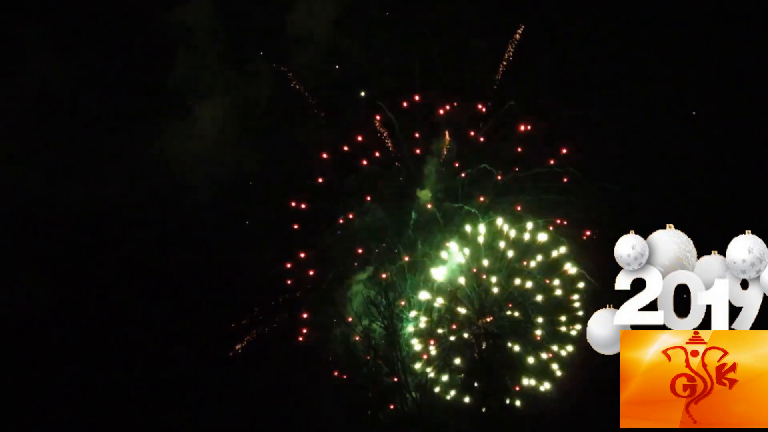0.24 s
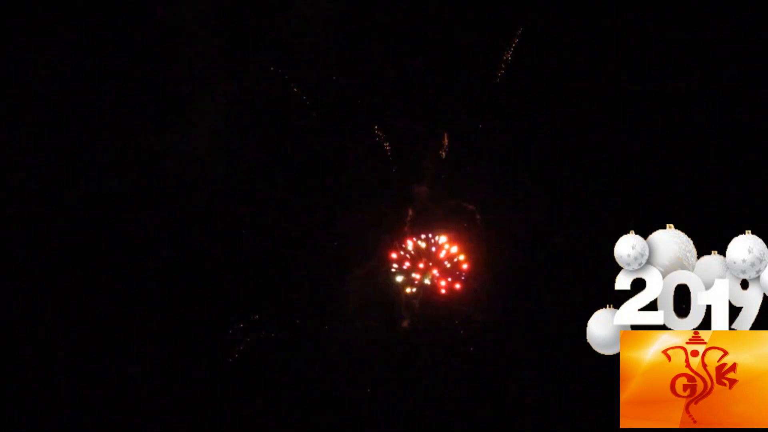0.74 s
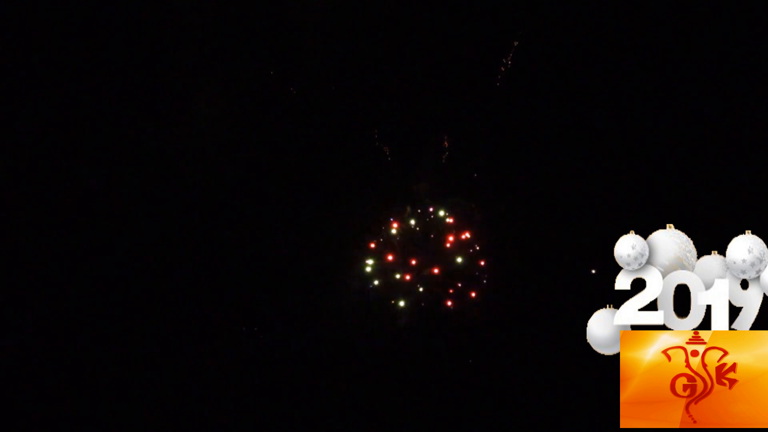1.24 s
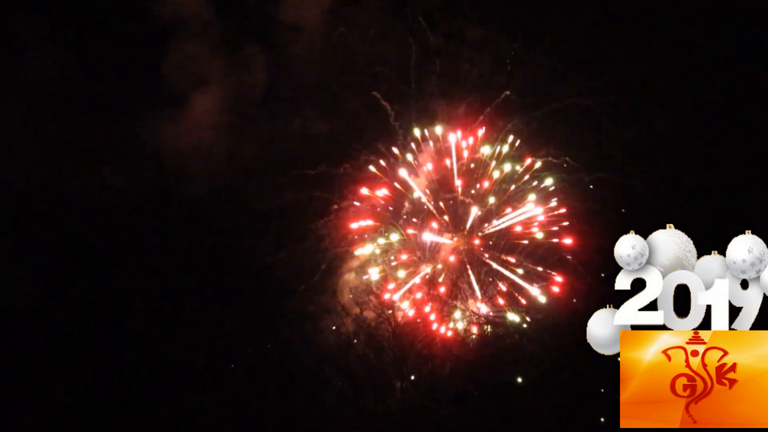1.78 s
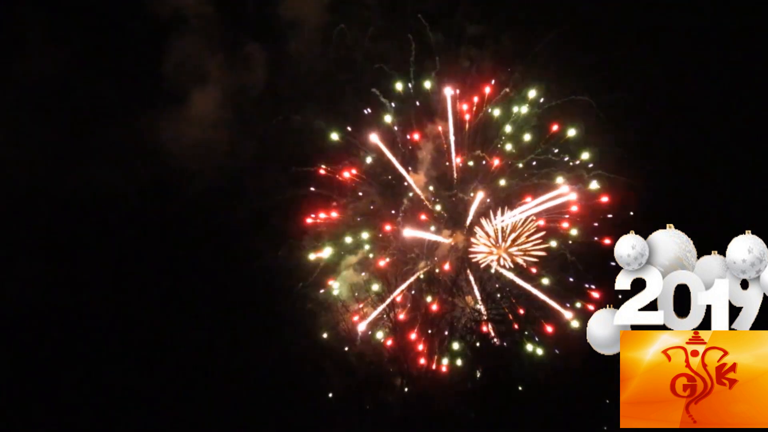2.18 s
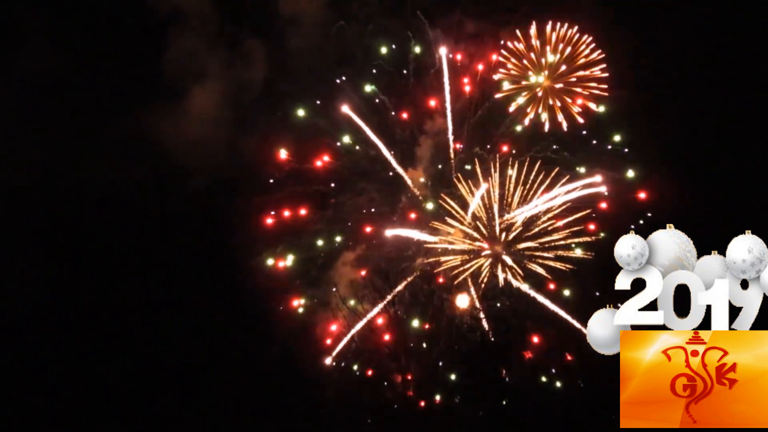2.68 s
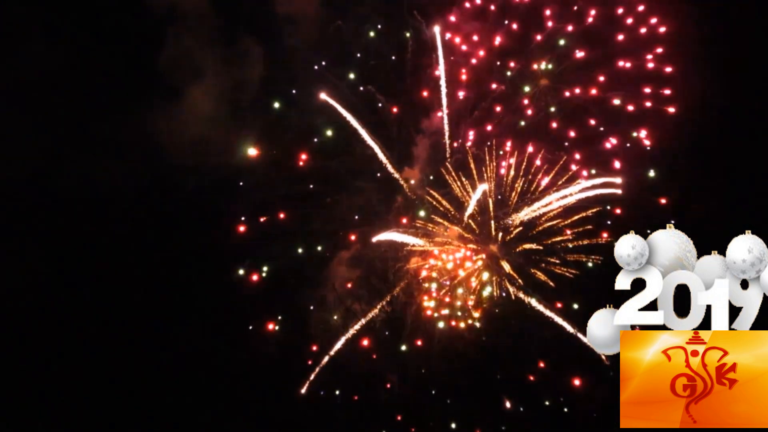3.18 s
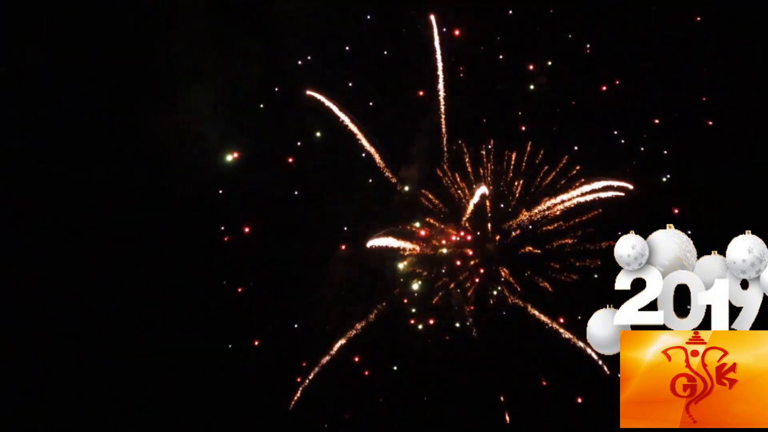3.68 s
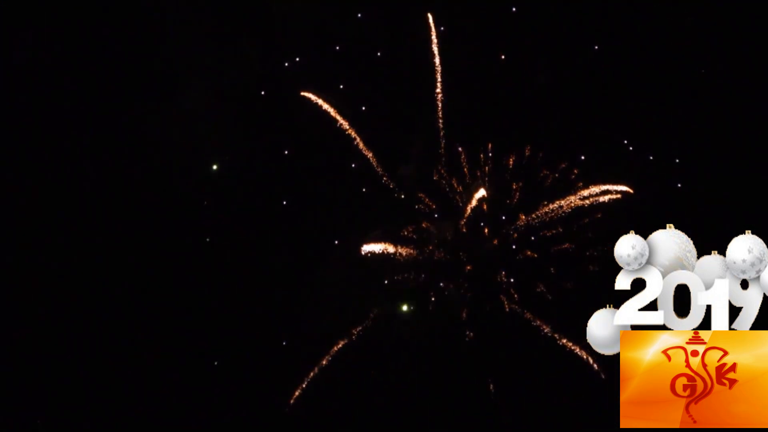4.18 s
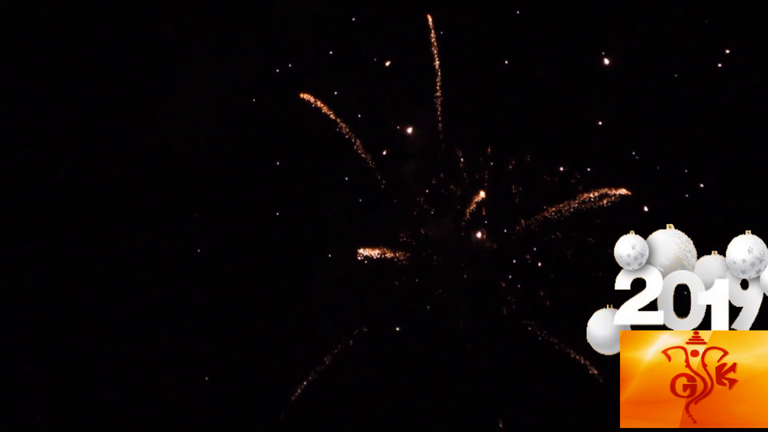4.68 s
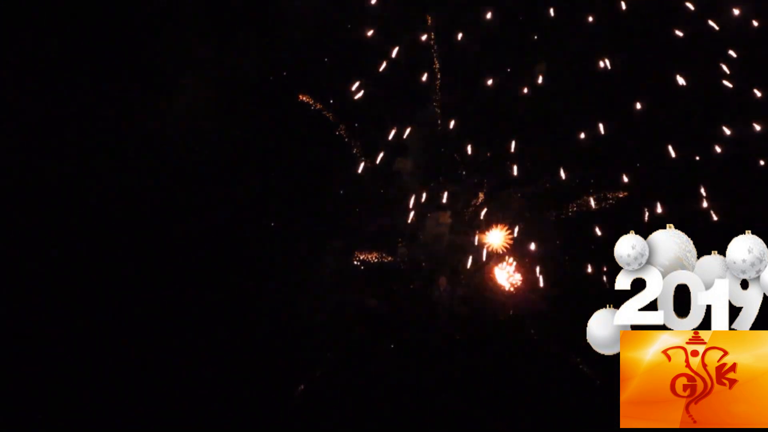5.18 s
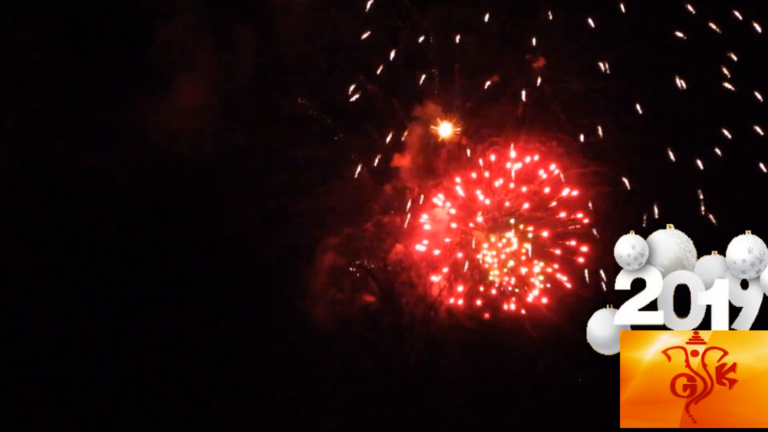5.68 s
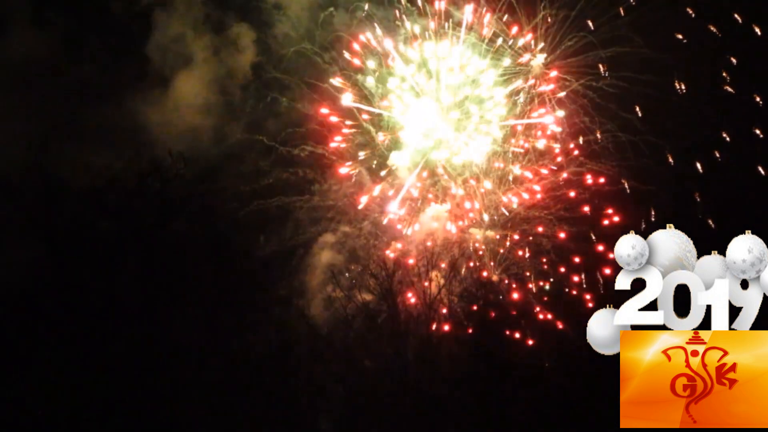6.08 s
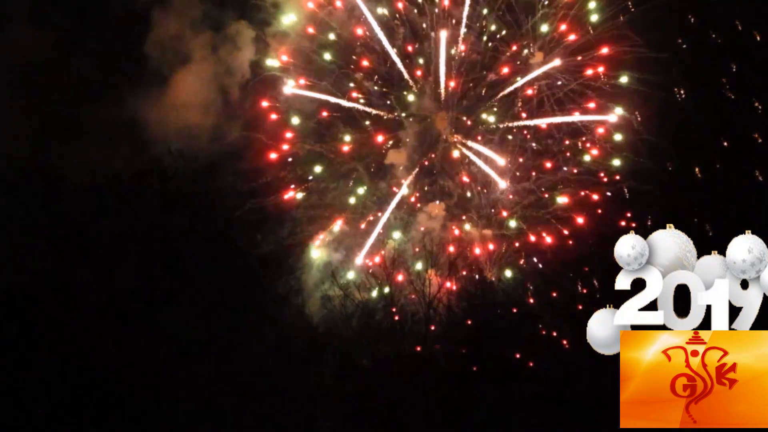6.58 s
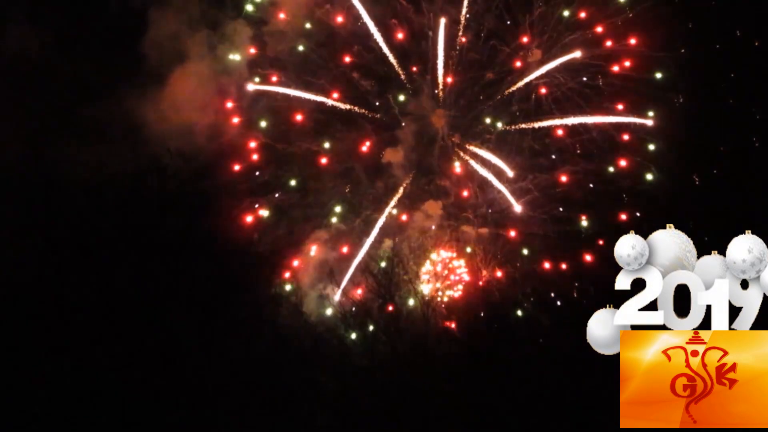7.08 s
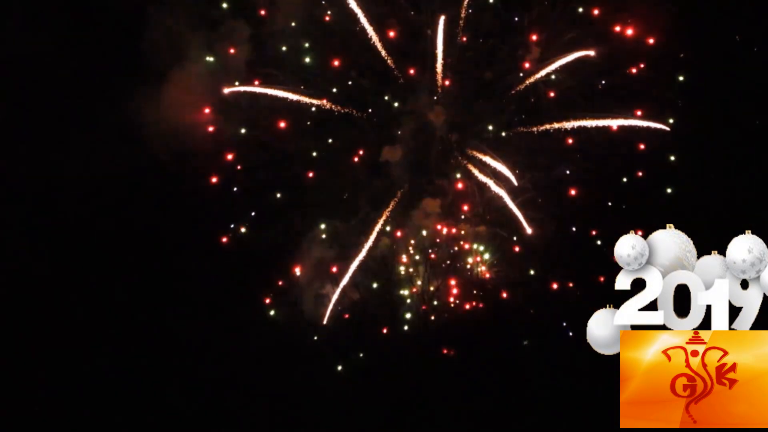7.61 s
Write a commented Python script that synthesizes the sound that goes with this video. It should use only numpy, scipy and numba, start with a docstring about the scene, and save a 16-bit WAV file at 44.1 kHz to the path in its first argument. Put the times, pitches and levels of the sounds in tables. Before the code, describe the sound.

Outdoor aerial fireworks: sharp, heavy bangs with rolling tails, a short lull, then a quick double bang and fading rumble over faint hiss.

```python
"""Open ground at night, firework shells bursting high overhead, heard through a small camera microphone.
Each burst is a filtered shock front that arrives direct and off the ground; random-reflector responses
scatter it into a rolling tail with separate echoes. Noise swells make duller far thuds, coloured noise makes
the far murmur, the rumble and a thin hiss with a whine. The gain control ducks at loud bangs and
creeps back, so that rumble and hiss swell in the gaps."""
import sys
import numpy as np
from scipy import signal
from scipy.fft import rfft, irfft, next_fast_len
from scipy.io import wavfile
from scipy.ndimage import uniform_filter1d, minimum_filter1d
from numba import njit

SR = 44100
rng = np.random.default_rng(int(sys.argv[2]) if len(sys.argv) > 2 else 0)


def unload_wav(signal):
    """Save mono or channel-first audio to the path in sys.argv[1] as 16-bit WAV at rate SR, clipped to [-1, 1]."""
    wavfile.write(
        sys.argv[1],
        SR,
        np.round(np.clip(np.atleast_2d(signal).T, -1, 1) * 32767).astype(np.int16),
    )


N = 346185
TIME = np.arange(N) / SR

# Shell bursts. Each row: start in seconds, level in dB, overpressure length in ms, air cut-off in Hz,
# second front lag in ms, its share as a factor, ground bounce lag in ms, its share as a factor,
# ground cut-off in Hz, near scatter in dB, far roll in dB, rumble level in dB.
SHELL_BURSTS = [ (0.8475, 14, 0.6, 1870, 0.83, 1.49, 4.58, 0.61, 3900, -15.5, -29, -33.5),
                (1.934, 15.5, 2.6, 3640, 0.52, 2.87, 4.3, 1.13, 420, -19.5, -25.5, -24),
                (2.7328, 19.5, 1.22, 3130, 0.62, 0.86, 4.79, 0.94, 1620, -12, -26.5, -28),
                (3.355, 20.5, 0.39, 940, 0.523, 0.86, 4.73, 0.85, 660, -9, -16.5, -34),
                (4.426, 24.5, 5, 5180, 0.73, 0.17, 4.69, 0.63, 1350, -16, -21, -21.5),
                (5.0928, 21, 1.25, 1600, 0.52, 0.41, 4.4, 0.8, 640, -16, -23, -28),
                (5.601, 20, 5.2, 1780, 0.59, 0.26, 4.87, 0.73, 6000, -11, -21, -27.5),
                (5.6825, 6.5, 0.46, 1510, 0.58, 0.88, 4.8, 1.84, 1900, -3, -21.5, -38.5)]

MIC_LOW_HZ, MIC_Q, MIC_SUB_HZ = 125.1, 1.176, 37.94
RUMBLE_RISE_S = 0.03
EARLIER_ROLL_DB, EARLIER_LENGTH_MS = -29.5, 1.3  # a shell whose rumble is already dying away at the start
HISS_DB = -67
WHINE_HZ, WHINE_DB = 1895, -5.5  # level relative to the hiss
TOP_HZ = 15300

# gain control: a fast stage ducks at once, a slower one lingers
AGC_WINDOW_S, AGC_THRESHOLD_DB, AGC_RATIO = 0.01, -8, 7
FAST_RELEASE_DB_S, SLOW_ATTACK_DB_S, SLOW_RELEASE_DB_S = 15.5, 294.5, 4
FAST_START_DB, SLOW_START_DB = 8.5, 6.5  # how far both stages are ducked at the start


def undb(db):
    """Decibels to gain."""
    return 10 ** (np.asarray(db) / 20)


def unit(x):
    """Scale to rms 1."""
    return x / np.sqrt(np.mean(x ** 2))


def band(x, lo_hz, hi_hz, order=2):
    """Butterworth band-pass."""
    edges_hz = [lo_hz, min(hi_hz, SR / 2 - 1)]
    return signal.sosfilt(signal.butter(order, edges_hz, "band", fs=SR, output="sos"), x)


def coloured(points):
    """Noise of rms 1 with a spectrum of (Hz, dB) points."""
    hz, db = np.transpose(points)
    size = next_fast_len(N)
    f_hz = np.fft.rfftfreq(size, 1 / SR) + 1  # keeps the logarithm finite
    gain = undb(np.interp(np.log(f_hz), np.log(hz), db))
    noise = irfft(rfft(rng.standard_normal(size)) * gain, size)
    return unit(noise[:N])


def walk(points_per_s, size=N):
    """Random wander with a spread near 1, straight between random points."""
    points = rng.standard_normal(4096)
    return np.interp(TIME[:size] * points_per_s, np.arange(4096), points) * np.sqrt(3 / 2)


def add(out, start_s, x):
    """Mix x into out from start_s."""
    i = int(start_s * SR)
    out[i:i + len(x)] += x[:N - i]


def blast(length_ms, air_hz, front_ms, front, bounce_ms, bounce, ground_hz, size=2048):
    """A shock front with its suction phase: in free air, above the ground, and as heard on the direct path."""
    jf = 1j * np.fft.rfftfreq(size, 1 / SR)

    def delay(ms):
        return np.exp(-2 * np.pi * jf * ms / 1000)

    # pressure jumps, then falls through zero as (1 - t / T) exp(-t / T)
    corner_hz = 1000 / (2 * np.pi * length_ms)
    jump = jf / (jf + corner_hz) ** 2 * SR / (2 * np.pi)
    # the air rounds the jump
    free = jump / (1 + jf / air_hz) ** 4
    # the microphone loses the deep bass and swings once or twice
    free = free * jf ** 2 / (jf ** 2 + jf * MIC_LOW_HZ / MIC_Q + MIC_LOW_HZ ** 2)
    free = free * jf / (jf + MIC_SUB_HZ)
    # soft ground returns a duller copy
    grounded = free * (1 + bounce * delay(bounce_ms) / (1 + jf / ground_hz))
    # the casing tears unevenly into two fronts; over all other directions they add in power
    direct = grounded * (1 + front * delay(front_ms))
    both_fronts = np.hypot(1, front)
    return irfft(free) * both_fronts, irfft(grounded) * both_fronts, irfft(direct)


def scatter(t60_s, onset_s, grain_db, patchy_db, patch_rate, size):
    """Response of many reflectors of uneven size that stand in groups and fade with distance."""
    t = TIME[:size]
    signs, sizes = rng.standard_normal((2, size))
    response = signs * undb(grain_db * sizes + patchy_db * walk(patch_rate, size=size))
    onset = 1 - np.exp(-(t / onset_s) ** 2)
    decay = np.exp(-np.log(1000) * t / t60_s)
    response = response * onset * decay
    return response / np.linalg.norm(response)


def swell(spread_s):
    """A short noise cluster of arrivals that peaks after spread_s and dies away."""
    t = TIME[:SR // 4] / spread_s
    return rng.standard_normal(len(t)) * t * np.exp(1 - t)


def shells():
    """Each burst, its scatter from things nearby, its separate echoes and its long roll."""
    # Echoes off rows of houses and trees. Each row: delay in seconds, level in dB, spread in seconds.
    echoes = [(0.054, -25, 0.0073), (.16, -35.5, 0.0053), (.375, -41.5, .015)]
    out = np.zeros(N)
    for start_s, db, *shape, near_db, far_db, _ in SHELL_BURSTS:
        free, grounded, direct = (undb(db) * x for x in blast(*shape))
        add(out, start_s, direct)

        # things within a few metres rattle the front and keep its edge
        close = scatter(t60_s=0.056, onset_s=0.0048, grain_db=9.0, patchy_db=-2.5, patch_rate=250, size=4000)
        edged = band(free, 230, 7000, order=1)
        add(out, start_s, undb(near_db) * signal.fftconvolve(edged, close))

        # the longer the path through the air, the duller the return
        near = scatter(t60_s=0.26, onset_s=0.0038, grain_db=6.0, patchy_db=2.0, patch_rate=190, size=14000)
        duller = band(band(free, 90, 7000, order=1), 30, 3700)
        add(out, start_s, undb(near_db) * signal.fftconvolve(duller, near))

        far = scatter(t60_s=1.9, onset_s=0.012, grain_db=4.5, patchy_db=2.44, patch_rate=20, size=80000)
        distant = band(band(grounded, 77, 2000, order=1), 30, 2900)
        add(out, start_s, undb(far_db) * signal.fftconvolve(distant, far))

        echoed = band(distant, 340, 1800, order=1)
        for delay_s, echo_db, spread_s in echoes:
            wall = swell(spread_s) / np.sqrt(2 * spread_s * SR)  # about unit energy
            add(out, start_s + delay_s, undb(echo_db) * signal.fftconvolve(echoed, wall))
    return out


def thuds():
    """Far reports as band-passed noise swells, smeared and dulled on their way."""
    # Distant thuds, pops and single strong echoes. Each row: start in seconds, level in dB,
    # centre in Hz, width in Hz, swell time in seconds.
    reports = [ (.005, -35, 89, 88.8, 0.067), (.3, -30, 354, 545, 0.014), (0.319, -31, 91, 70, 0.0064),
               (0.902, -30.5, 317, 250, 0.013), (2.304, -26.5, 157, 176, 0.011),
               (2.546, -27.5, 590, 440, 0.0027), (2.891, -32, 390, 910, 0.0044),
               (3.105, -33.5, 670, 744, 0.0062), (3.519, -28, 368, 337, 0.013),
               (4.157, -29.5, 376, 266, 0.006), (4.788, -19.5, 107.5, 87.4, 0.012),
               (5.035, -30.5, 550, 640, 0.0053), (5.976, -29.5, 130, 162, 0.016),
               (6.398, -30, 178.6, 219, 0.0077), (6.873, -53.5, 3430, 5000, 0.0015),
               (7.64, -37.5, 120, 277, 0.02)]
    out = np.zeros(N)
    for start_s, db, centre_hz, width_hz, spread_s in reports:
        low_hz = np.hypot(centre_hz, width_hz / 2) - width_hz / 2  # centre is the geometric mean
        thud = band(swell(spread_s), low_hz, low_hz + width_hz, order=3)
        thud = thud * np.sqrt(2 * spread_s * SR) / np.linalg.norm(thud)
        add(out, start_s, undb(db) * thud)
    return out


def rumble():
    """Each burst sets the landscape rumbling, long blasts more deeply; the rolls fade into a far murmur."""
    # Rumble spectrum. Each row: frequency in Hz, level in dB.
    colour = [(25, -15.5), (50, -6), (86, 0.5), (157, 6), (210, -2.5), (281, 0), (391, -5), (520, -4.5),
              (742, -12), (1200, -22.5), (1650, -28), (1950, -36.5), (2500, -40.5), (3500, -49)]
    # Registers. Each row: low edge in Hz, high edge in Hz, murmur in dB, share of each roll in dB,
    # fade in dB per second, gain in dB per doubling of a blast's length, heave in dB,
    # heave points per second.
    registers = [ (21.66, 116, -51.5, -7.5, 18, 1.44, 1.5, 9.9), (152, 573, -45, -3, 18.5, 1, 1.5, 23),
                 (736, 2700, -54.5, -11, 17.5, 0, 1.2, 49)]
    out = np.zeros(N)
    rise = 1 - np.exp(-TIME / RUMBLE_RISE_S)
    for lo_hz, hi_hz, murmur_db, share_db, fade_db_s, length_db, heave_db, heave_rate in registers:

        def roll_power(db, length_ms):
            start_db = db + share_db + length_db * np.log2(length_ms)
            return undb(start_db - fade_db_s * TIME) ** 2

        power = undb(murmur_db) ** 2 + roll_power(EARLIER_ROLL_DB, EARLIER_LENGTH_MS)
        for start_s, _, length_ms, *_, rumble_db in SHELL_BURSTS:
            add(power, start_s, rise * roll_power(rumble_db, length_ms))
        noise = unit(band(coloured(colour), lo_hz, hi_hz, order=3))
        out += noise * np.sqrt(power) * undb(heave_db * walk(heave_rate))
    return out


def hiss():
    """Faint even microphone hiss plus a thin wavering whine of narrow-band noise."""
    # Hiss spectrum. Each row: frequency in Hz, level in dB.
    colour = [(1000, 4), (3000, 1.5), (8000, -5), (11000, -7), (14000, -20), (16000, -28.5)]
    whine = unit(band(rng.standard_normal(N), WHINE_HZ - 20, WHINE_HZ + 20))
    return (coloured(colour) + undb(WHINE_DB) * whine) * undb(HISS_DB)


@njit
def follow(wanted, start, attack, release):
    """Chase a level in dB, rising and falling no faster than the given dB per second."""
    out, now = np.empty(len(wanted)), start
    for i in range(len(wanted)):
        now += min(max(wanted[i] - now, -release / SR), attack / SR)
        out[i] = now
    return out


def gain_control(x):
    """Turn down by a share of the excess over the threshold, looking a little ahead; recover in two stages."""
    window = int(AGC_WINDOW_S * SR)
    level_db = 10 * np.log10(np.maximum(uniform_filter1d(x ** 2, window), 1e-12))
    held_db = -minimum_filter1d(-level_db, window)  # running maximum
    wanted_db = np.maximum(held_db - AGC_THRESHOLD_DB, 0) * (1 - 1 / AGC_RATIO)
    fast_db = follow(wanted_db, float(FAST_START_DB), np.inf, float(FAST_RELEASE_DB_S))
    slow_db = follow(wanted_db, float(SLOW_START_DB), float(SLOW_ATTACK_DB_S), float(SLOW_RELEASE_DB_S))
    return x * undb(-np.maximum(fast_db, slow_db))


def scene():
    """Sum of all sources, one channel, ahead of the gain control."""
    return (shells() + thuds() + rumble() + hiss())[None]


def record(dry):
    """The gain ducks at loud bangs, the loudest fronts still round off at full scale, and the top is cut."""
    ducked = gain_control(dry[0])[None]
    clipped = ducked / (1 + ducked ** 10) ** (1 / 10)
    return signal.sosfilt(signal.ellip(8, 0.1, 70, TOP_HZ, fs=SR, output="sos"), clipped)


dry = scene()
out = record(dry)
unload_wav(out)
```